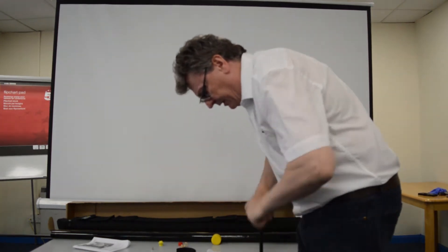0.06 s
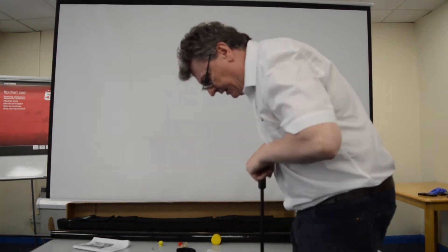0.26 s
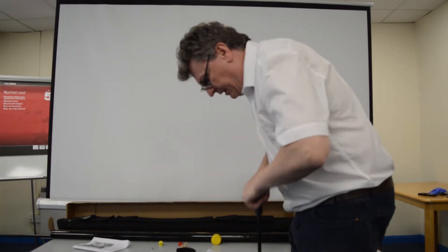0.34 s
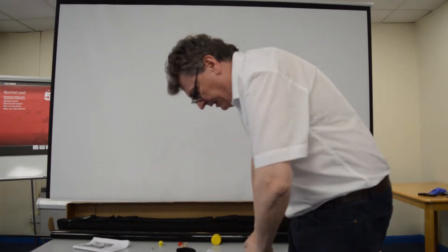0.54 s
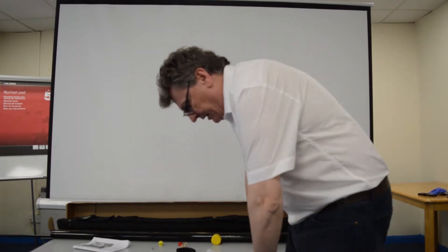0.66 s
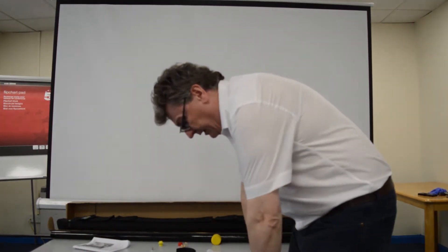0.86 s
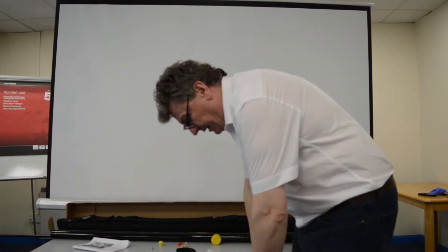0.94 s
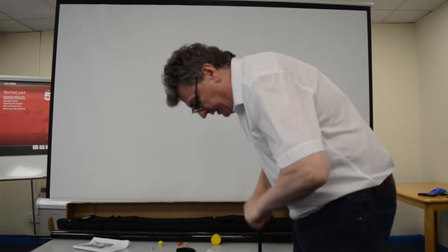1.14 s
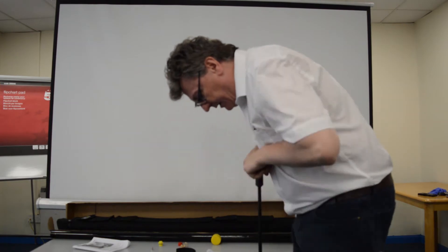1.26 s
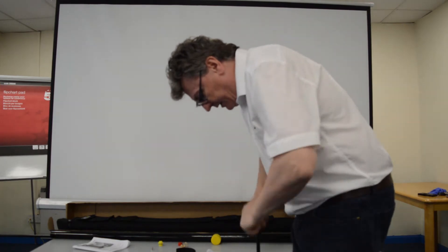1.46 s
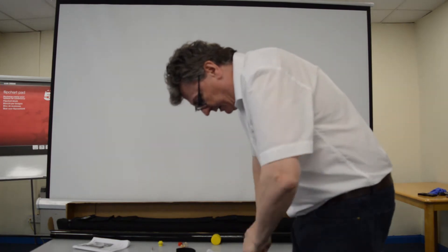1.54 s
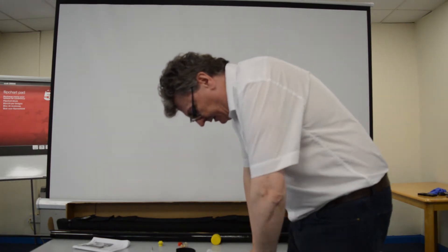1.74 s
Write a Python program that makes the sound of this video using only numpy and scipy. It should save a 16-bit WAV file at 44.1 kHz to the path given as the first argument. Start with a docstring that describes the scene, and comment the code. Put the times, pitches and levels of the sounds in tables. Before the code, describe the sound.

A floor pump sucks in air and clacks sharply against its top stop at about 0.25 seconds. The push rushes from 0.35, swelling into a high hiss, with a low thump and thin valve whistle near 0.9. A second, quieter pull follows from 1.0. The next push rushes from 1.4 with a soft knock, then squeals faintly and hisses near 1.7. The small room hums faintly.

```python
"""A floor pump, worked through two strokes in a small quiet room with a low hum.
Each pull sucks air into the barrel; each push rushes until the valve squeals open and hisses.
The valve whistles as it shuts after the first push. The first pull clacks against the top stop,
the first push thumps at the bottom, the second knocks softly. The shaft rubs, scrapes and ticks."""
import sys
import numpy as np
from scipy import signal
from scipy.fft import rfft, irfft
from scipy.io import wavfile
from scipy.ndimage import uniform_filter1d

SR = 44100
rng = np.random.default_rng(int(sys.argv[2]) if len(sys.argv) > 2 else 0)


def to_wav(s):
    """Save 16-bit WAV."""
    ch = np.atleast_2d(s).T  # columns
    pcm = np.round(np.clip(ch, -1, 1) * 32767)  # PCM
    wavfile.write(sys.argv[1], SR, pcm.astype(np.int16))


N = 79380
T = np.arange(N) / SR
BIN_HZ = np.fft.rfftfreq(512, 1 / SR)
FRAME_S = np.arange(N // 128 + 5) * 128 / SR


def amp(db):
    """Decibels to gain."""
    return 10 ** (np.asarray(db) / 20)


def unit(x):
    """Scale to rms 1."""
    return x / np.sqrt(np.mean(x ** 2) + 1e-20)


def at_hz(points, hz):
    """Interpolate (freq_hz, value) rows on a log-frequency axis."""
    freq_hz, value = np.transpose(points)
    return np.interp(np.log(hz + 1), np.log(freq_hz + 1), value)


def envelope(rows):
    """Gain along (time_s, level_db) rows, falling 160 dB/s outside them."""
    time_s, level_db = np.transpose(rows)[:2]
    outside_s = abs(T - np.clip(T, time_s[0], time_s[-1]))
    return amp(np.interp(T, time_s, level_db) - 160 * outside_s)


def arch(start_s, length_s):
    """Half-sine envelope."""
    return np.sin(np.pi * np.clip((T - start_s) / length_s, 0, 1))


def struck(start_s, rise_s, t60_s):
    """Linear rise, exponential decay."""
    t = np.maximum(T - start_s, 0)
    return np.minimum(t / rise_s, 1) * amp(-60 * t / t60_s)


def add(mix, start_s, sound):
    """Mix a sound in at start_s."""
    part = mix[round(start_s * SR):][:len(sound)]
    part += sound[:len(part)]


def turbulence(shape_db, patchy_db):
    """Air noise of rms 1: fixed or moving spectrum with random patches of level."""
    real, imag, patches = rng.standard_normal((len(FRAME_S), len(BIN_HZ), 3)).T
    gain = amp(shape_db).reshape(len(BIN_HZ), -1)
    gain = gain / np.sqrt((gain ** 2).mean(0))
    patches = unit(uniform_filter1d(uniform_filter1d(patches, size=8, axis=0), size=6, axis=1))
    spectrum = (real + 1j * imag) * gain * amp(patchy_db * patches)
    return unit(signal.istft(spectrum, nperseg=512, noverlap=384)[1][:N])


def resonance(hz, width_hz):
    """Narrow-band noise of rms 1; the centre may glide."""
    pole = np.exp(-2 * np.pi * width_hz / SR)
    noise = rng.standard_normal(N) + 1j * rng.standard_normal(N)
    baseband = signal.lfilter([1], np.poly([pole, pole]), noise)
    carrier = np.exp(2j * np.pi * np.cumsum(hz * np.ones(N)) / SR)
    return unit((baseband * carrier).real)


def flutter(cutoff_hz=120):
    """Low-passed random motion of rms 1."""
    lowpass = np.exp(-(np.fft.rfftfreq(N, 1 / SR) / cutoff_hz) ** 2)
    return unit(irfft(rfft(rng.standard_normal(N)) * lowpass, N))


def burst(decay_s):
    """Decaying noise of unit energy."""
    t = T[:SR // 10]
    noise = rng.standard_normal(len(t)) * np.exp(-t / decay_s)
    return noise / np.linalg.norm(noise)


def colour(x, spectrum):
    """Minimum-phase filter of unit energy."""
    log_gain = np.log(amp(at_hz(spectrum, abs(np.fft.fftfreq(2048, 1 / SR)))))
    taps = np.fft.ifft(np.exp(np.conj(signal.hilbert(log_gain)))).real
    return signal.fftconvolve(x, taps / np.linalg.norm(taps))[:N]


def near_echoes(x):
    """Reflections from floor and table comb the sound."""
    taps = .5 * burst(decay_s=.011)
    taps[0] += 1
    return signal.fftconvolve(x, taps / np.linalg.norm(taps))[:N]


def room(x, wet_db):
    """Add dense reflections, each band with its own decay."""
    # reverberation: freq_hz, t60_s
    decay = [(100, 0.37), (500, 0.31), (15000, 0.29)]
    t = T[:SR // 2]
    taps = rng.choice([-1., 1.], len(t)) * (rng.random(len(t)) < 4000 / SR) * (t > .004)
    hz, time_s, bands = signal.stft(taps, SR, nperseg=256)
    tail = signal.istft(bands * amp(-60 * time_s / at_hz(decay, hz)[:, None]), SR, nperseg=256)[1]
    return x + amp(wet_db) * signal.fftconvolve(x, tail / np.linalg.norm(tail))[:N]


def background(hum_hz=94.5, air_db=-53.5):
    """Still room air and a low hum that wavers and grows."""
    # hum: time_s, level_db
    hum_levels = [(0, -63.5), (.85, -67.5), (1.0, -58.5), (1.8, -56)]
    # room air spectrum: freq_hz, gain_db
    spectrum = [(20, -1), (50, 3.5), (130, -4.5), (800, -17), (5000, -23), (10000, -11), (15800, -27.5)]
    tone = np.sin(2 * np.pi * (hum_hz * T + rng.random()))
    hum = envelope(hum_levels) * unit(tone + .5 * resonance(hum_hz, width_hz=8.6))
    air_gain = amp(at_hz(spectrum, np.fft.rfftfreq(N, 1 / SR)))
    return hum + amp(air_db) * unit(irfft(rfft(rng.standard_normal(N)) * air_gain, N))


def intake():
    """Air sucked in on each pull, coloured by the barrel, whistling thinly at the inlet."""
    # airflow, one curve per pull: time_s, level_db
    pulls = [
        [(0, -61), (.17, -49), (.205, -39.5), (.235, -38.5), (.31, -44.5), (.34, -41)],
        [(1.02, -61), (1.052, -42.5), (1.08, -57.5), (1.19, -49.5), (1.22, -44), (1.255, -48), (1.305, -40.5),
         (1.34, -50.5)],
    ]
    # hiss spectrum: freq_hz, gain_db
    spectrum = [(300, -24), (1500, -2.5), (3600, -6.5), (9500, -3), (11200, 1.5), (12500, -17),
                (15800, -22)]
    # barrel resonances: centre_hz, width_hz, lift_db
    barrel = [(3220, 690, 7.5), (9460, 270, 8)]
    # inlet whistles: pitch_hz, level_re_hiss_db
    inlet = [(5430, -12), (10310, -6.5)]
    barrel_db = sum(db / (1 + (2 * (BIN_HZ - hz) / width_hz) ** 2) for hz, width_hz, db in barrel)
    whistles = sum(amp(db) * resonance(hz, width_hz=140) for hz, db in inlet)
    hiss = turbulence(at_hz(spectrum, BIN_HZ) + barrel_db, patchy_db=2.5)
    return sum(map(envelope, pulls)) * (hiss + whistles)


def shaft_friction():
    """The shaft rubs on its seal and, on the second stroke, scrapes in its guide."""
    # rubbing: time_s, level_db
    rub_levels = [(0, -52), (.1, -55.5), (.19, -50.5), (.6, -54), (.74, -50.5), (.82, -55), (.96, -57.5),
                  (.995, -45), (1.09, -51.5), (1.3, -54.5), (1.46, -49.5), (1.6, -54.5), (1.8, -53)]
    # rubbing spectrum: freq_hz, gain_db
    spectrum = [(150, -2), (950, -0.5), (2600, -3), (4000, -14), (9000, -20)]
    # scraping: time_s, level_db
    scrape_levels = [(1.2, -57), (1.36, -53), (1.43, -49.5), (1.62, -68.5), (1.71, -55)]
    # shaft resonances: centre_hz, width_hz, gain_db
    modes = [(1334, 190, -2), (1655, 160, 2.5)]
    rub = near_echoes(turbulence(at_hz(spectrum, BIN_HZ), patchy_db=2.5))
    scrape = unit(sum(amp(db) * resonance(hz, width_hz) for hz, width_hz, db in modes))
    return envelope(rub_levels) * rub + envelope(scrape_levels) * scrape


def shaft_ticks():
    """Small ticks and scuffs of the shaft."""
    # ticks: start_s, energy_db, decay_s
    ticks = [(0.186, -18, 0.0066), (0.975, -17.5, 0.0014), (0.986, -22.5, .007), (1.212, -21.5, .006),
             (1.697, -24.5, 0.011)]
    # tick spectrum: freq_hz, gain_db
    spectrum = [(600, -12.5), (1500, 5.5), (3400, -3.5), (4800, -17)]
    hits = np.zeros(N)
    for start_s, db, decay_s in ticks:
        add(hits, start_s, amp(db) * burst(decay_s))
    return room(colour(hits, spectrum), wet_db=-9)


def top_clack():
    """The hard metal top stop snaps and rattles briefly."""
    # contacts: start_s, level_db
    clacks = [(0.2369, 2.5), (0.2396, -4), (0.2426, -2.5), (0.2532, -8.5), (0.2655, -13)]
    # metal spectrum: freq_hz, gain_db
    spectrum = [(60, -70), (400, -5), (1250, 3.5), (1680, -3), (1950, 6.5), (2250, -2), (2550, 3),
                (3500, 5.5), (4400, -6), (5500, -2.5), (8000, -6.5), (10300, 2), (16000, -33)]
    hits = np.zeros(N)
    for start_s, db in clacks:
        snap = .94 * burst(decay_s=.0042)
        snap[0] = -1  # impact ahead of the rattle
        add(hits, start_s, amp(db) * snap)
    return room(colour(hits, spectrum), wet_db=-6)


def piston_blows(t60_s=.044, low_cut_hz=146.3):
    """Blows on the stops ring pump and floor, which radiate no deep bass; long contacts sound dull."""
    # strikes and bounces: start_s, level_db, contact_ms
    blows = [(0.2377, -10, 0.48), (0.2451, -18.5, 0.41), (0.2667, -26, 1.2), (0.8574, -26.5, 2.4),
             (0.8673, -16.5, 6.5)]
    # pump and floor modes: pitch_hz, gain_db
    modes = [(140, -22), (188, -12), (250, -8), (342, 0), (474, 3), (606, 2.5), (1000, -10.5),
             (1260, -12.5)]
    force, t = np.zeros(N), T[:SR // 2]
    for start_s, db, contact_ms in blows:
        progress = t / (contact_ms / 1000)
        pulse = progress * np.exp(-np.pi * progress)
        add(force, start_s, amp(db) * pulse / pulse.sum())
    ring = sum(amp(db - 60 * t / t60_s) * np.sin(2 * np.pi * hz * t) for hz, db in modes)
    ring = signal.sosfilt(signal.butter(6, low_cut_hz, "high", fs=SR, output="sos"), ring)
    return room(signal.fftconvolve(force, ring)[:N], wet_db=-4)


def piston_rush():
    """Air forced past the piston on each push."""
    # airflow, one curve per push: time_s, level_db
    pushes = [
        [(.32, -76), (.365, -38.5), (.44, -37), (.51, -42), (.60, -43), (.74, -40), (.86, -41.5)],
        [(1.37, -60), (1.415, -41.5), (1.447, -36.5), (1.55, -37), (1.61, -42), (1.675, -51.5), (1.8, -46)],
    ]
    # rush spectrum: freq_hz, gain_db
    spectrum = [(1200, -15), (7000, -5.5), (9200, 1), (10600, 1), (12500, -7.5), (15800, -18)]
    return sum(map(envelope, pushes)) * turbulence(at_hz(spectrum, BIN_HZ), patchy_db=1.0)


def valve_squeals(length_s=.095, rise_hz_per_s=38000):
    """The valve squeals upwards as it cracks open."""
    # openings: start_s, level_db, start_hz
    squeals = [(.592, -56, 13300), (1.685, -49.5, 12000)]
    mix = np.zeros(N)
    for start_s, db, start_hz in squeals:
        pitch_hz = start_hz + rise_hz_per_s * np.clip(T - start_s, 0, length_s)
        mix += amp(db) * arch(start_s, length_s) * resonance(pitch_hz, width_hz=600)
    return mix


def valve_jet(edge_order=7.9):
    """The valve hiss starts thin and high and spreads downwards as the gap widens."""
    # jet, one curve per push: time_s, level_db, lower_edge_hz
    jets = [
        [(.605, -56, 12600), (.65, -45, 9500), (.70, -37, 6500), (.76, -33.5, 6400), (.855, -32.5, 6650),
         (.89, -39.5, 9100), (.96, -57, 9900)],
        [(1.69, -60, 11000), (1.74, -43.5, 9200), (1.78, -40, 7950), (1.8, -44.5, 7500)],
    ]
    # jet spectrum: freq_hz, gain_db
    spectrum = [(4000, -10), (7000, -2.5), (11700, 0), (13000, -6.5), (15800, -18)]
    mix, hz = np.zeros(N), BIN_HZ[:, None] + 1
    for curve in jets:
        time_s, _, lower_edge_hz = np.transpose(curve)
        edge_hz = np.interp(FRAME_S, time_s, lower_edge_hz)
        cut_db = 20 * np.log10(1 + (edge_hz / hz) ** edge_order)
        tilt_db = 8 * np.log2(edge_hz / 6500) * np.log2(hz / edge_hz)  # narrower gap, brighter hiss
        mix += envelope(curve) * turbulence(at_hz(spectrum, hz) - cut_db + tilt_db, patchy_db=1.7)
    return mix


def valve_whistles(waver_hz=22, sag_hz_per_s=500, flutter_db=1.5):
    """Clear tones of the closing valve flutter and sag as the pressure falls."""
    # tones: start_s, length_s, pitch_hz, level_db
    whistles = [(.78, .225, 6975, -52), (.875, .08, 9365, -41.5), (.925, .035, 9110, -44),
                (.94, .065, 9090, -52), (.85, .13, 10715, -52), (.80, .2, 11545, -49),
                (.81, .14, 13750, -57)]
    mix = np.zeros(N)
    for start_s, length_s, hz, db in whistles:
        pitch_hz = hz + waver_hz * flutter() - sag_hz_per_s * (T - start_s - length_s / 2)
        gain = amp(db + flutter_db * flutter()) * arch(start_s, length_s)
        mix += gain * np.sin(2 * np.pi * np.cumsum(pitch_hz) / SR)
    return mix


def floor_thud(level_db=-34.5):
    """Floor and room shudder as the first push bottoms out."""
    # shudder spectrum: freq_hz, gain_db
    spectrum = [(50, -28), (125, 4), (350, -3.5), (1200, -50.5)]
    shudder = colour(rng.standard_normal(N), spectrum)
    shudder /= np.sqrt(abs(uniform_filter1d(shudder ** 2, size=700)))  # steady power
    return amp(level_db) * struck(start_s=.858, rise_s=.008, t60_s=.35) * shudder


def guide_knock(level_db=-42.5):
    """The shaft bumps its guide on the second push: soft and hollow."""
    # guide modes: pitch_hz
    modes = [595, 1325]
    ring = sum(np.sin(2 * np.pi * hz * T) for hz in modes)
    return amp(level_db) * struck(start_s=1.434, rise_s=.0048, t60_s=.12) * ring


def scene():
    """Pump and room, mono."""
    hiss = intake() + near_echoes(piston_rush() + valve_jet())
    valve = valve_squeals() + valve_whistles()
    shaft = shaft_ticks() + shaft_friction() + guide_knock()
    stops = piston_blows() + floor_thud() + top_clack()
    return (hiss + valve + shaft + stops + background())[None]


def record(dry):
    """Low-pass at 15.9 kHz."""
    taps = signal.firwin(511, 15900, window=("kaiser", 9), fs=SR)
    return signal.oaconvolve(dry, taps[None], "same")


dry = scene()
out = record(dry)
to_wav(out)
```